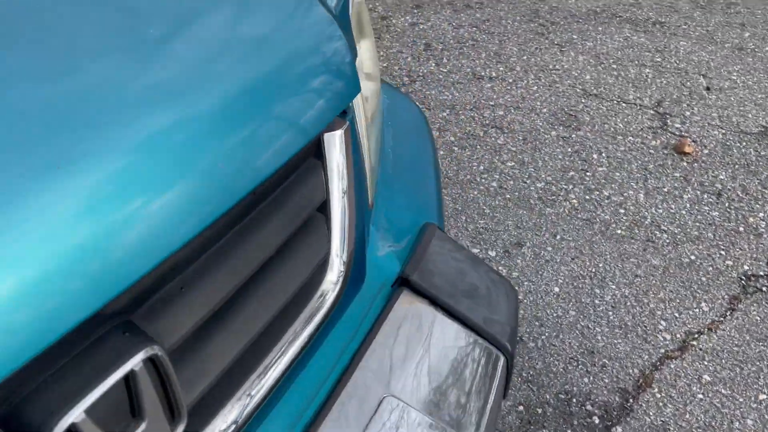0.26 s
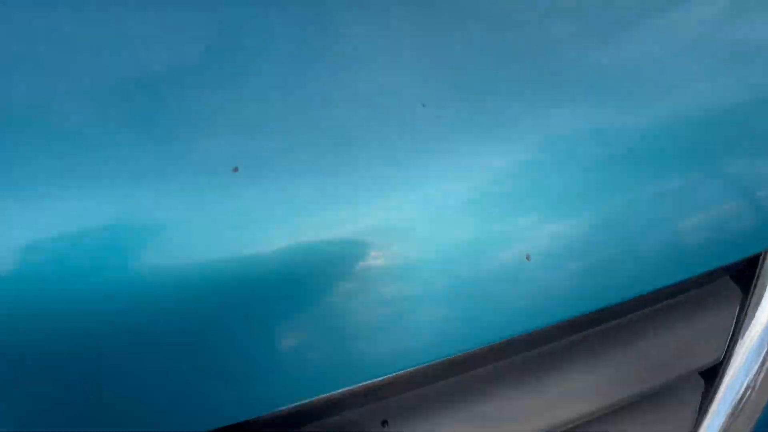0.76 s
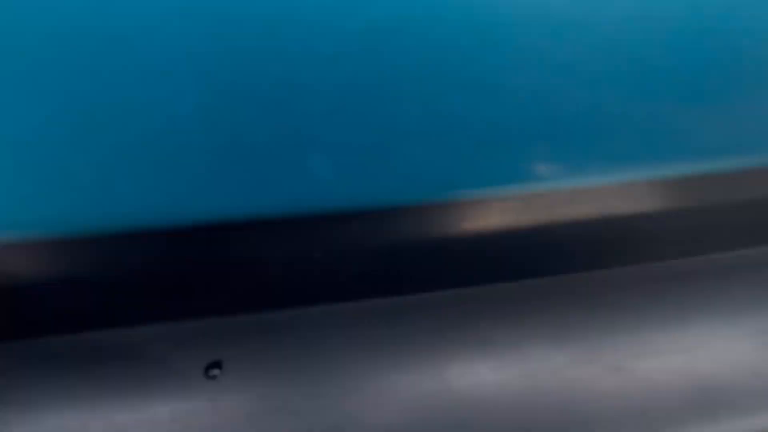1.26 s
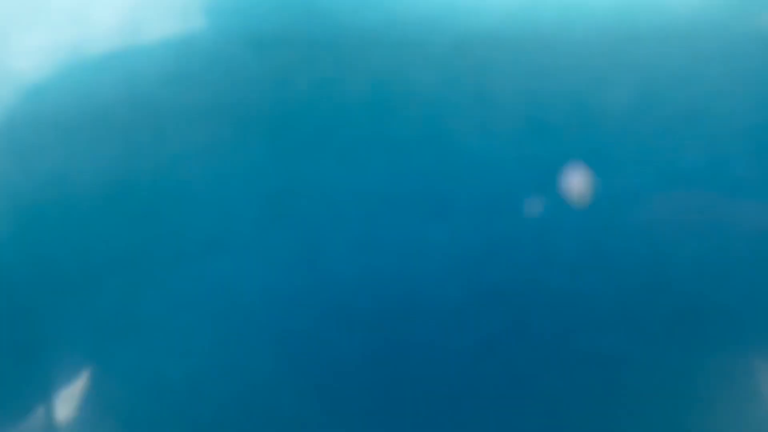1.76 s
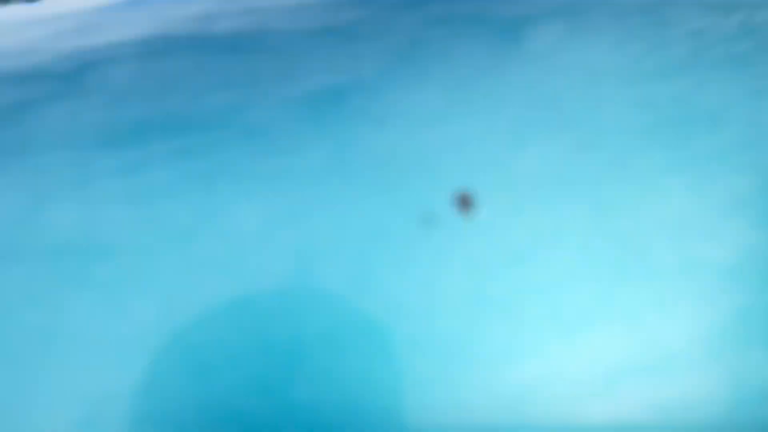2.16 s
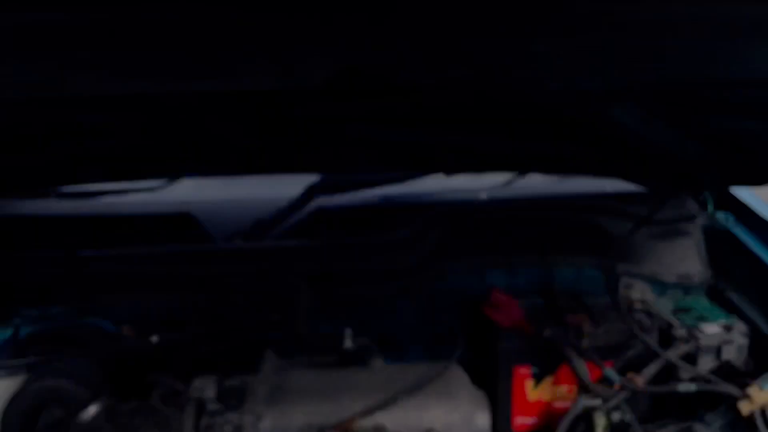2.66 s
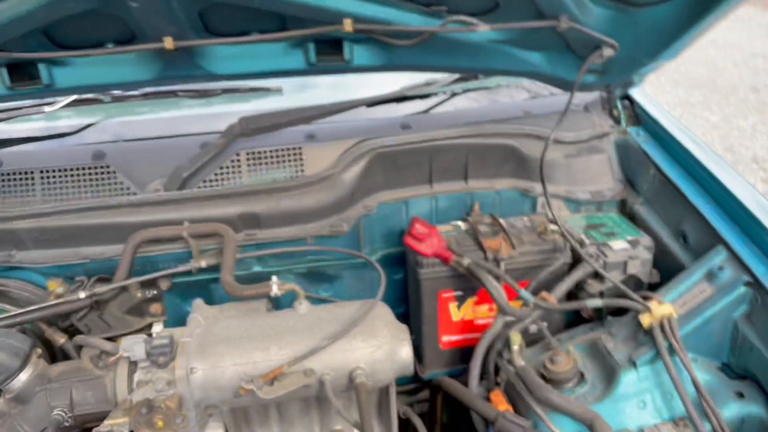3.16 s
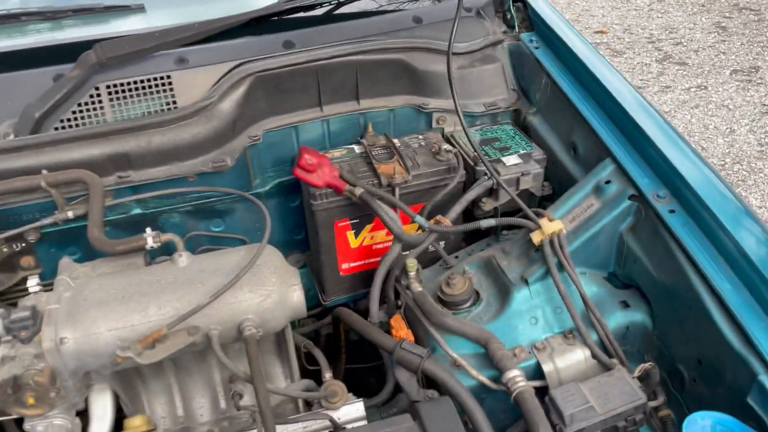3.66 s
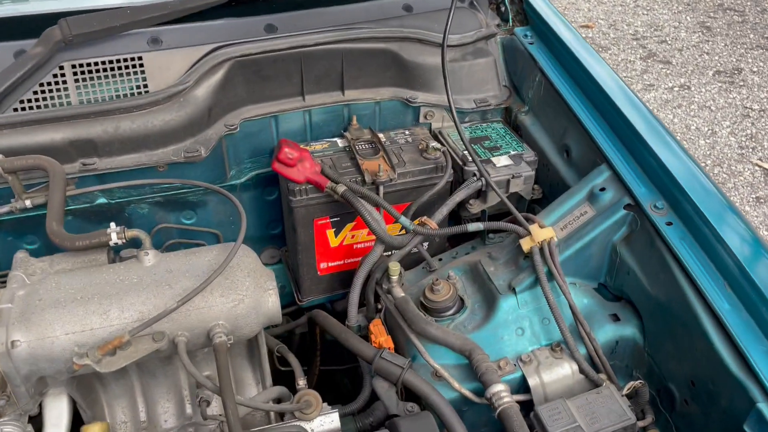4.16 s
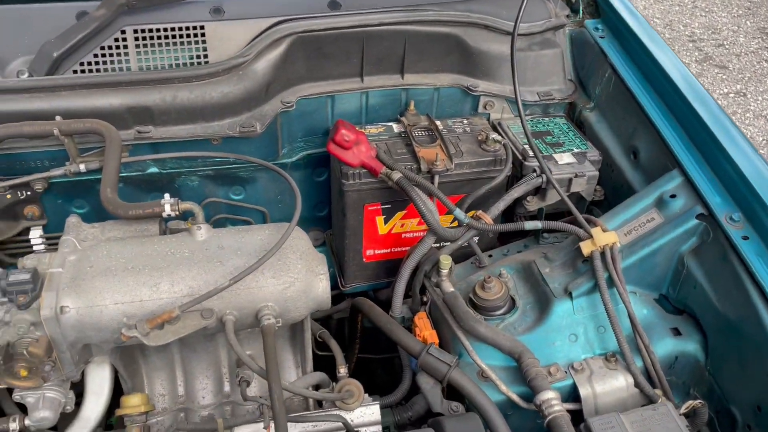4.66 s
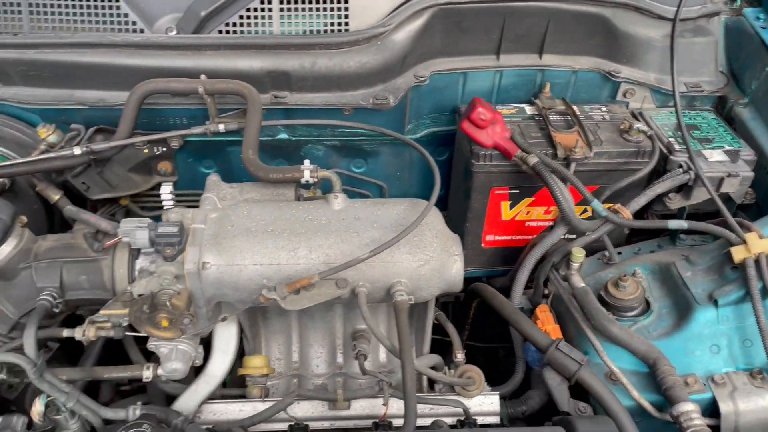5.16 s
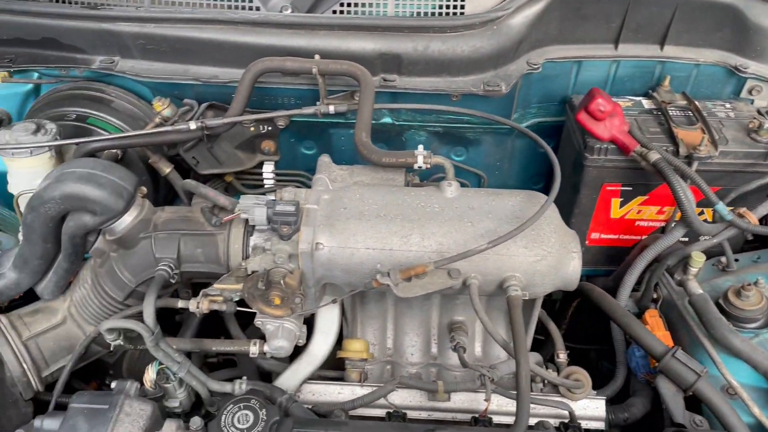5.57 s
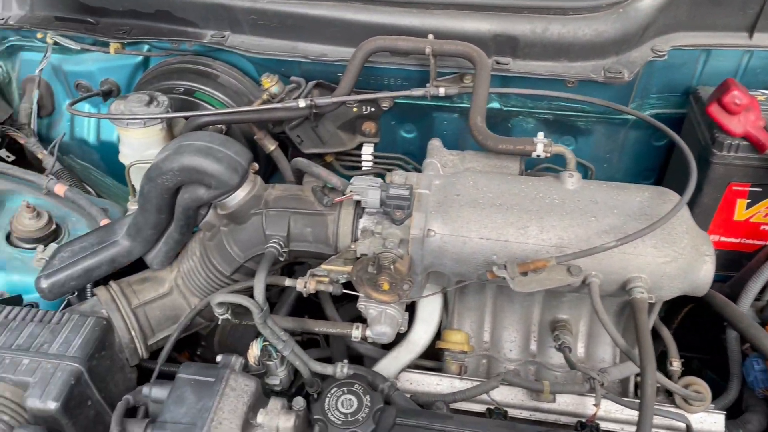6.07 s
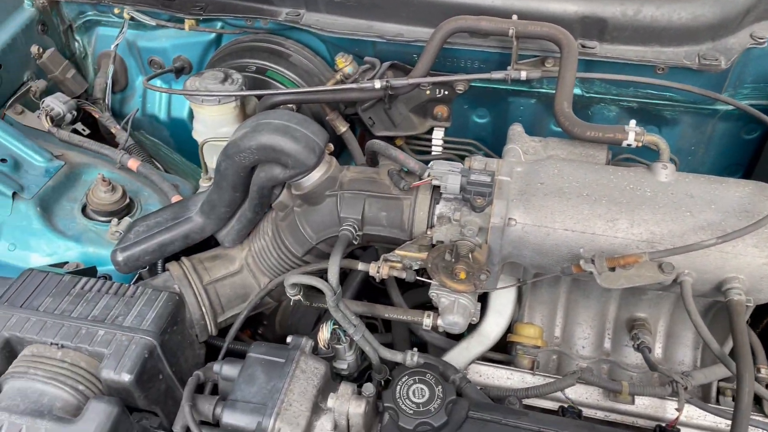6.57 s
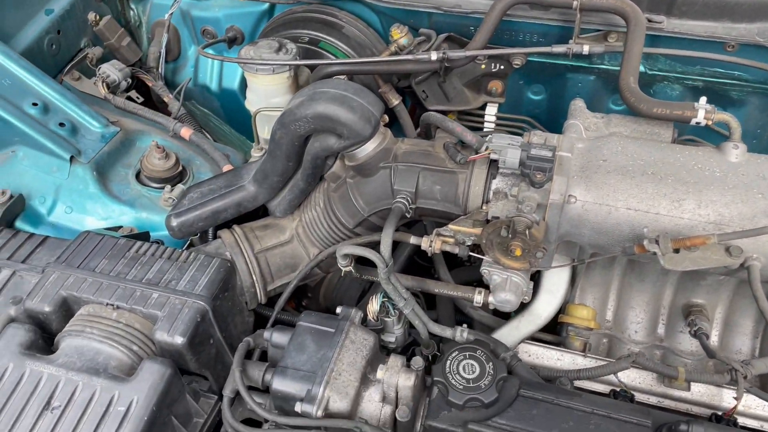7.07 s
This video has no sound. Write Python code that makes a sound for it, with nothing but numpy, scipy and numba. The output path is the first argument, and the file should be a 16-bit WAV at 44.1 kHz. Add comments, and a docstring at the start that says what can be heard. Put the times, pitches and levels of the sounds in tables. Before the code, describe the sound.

Outdoors on asphalt, a handheld microphone nears an idling four-cylinder car engine, dull behind grille and hood. Shoes scrape grit and snap small stones, the hood latch clacks and rattles, then the safety catch snaps harder. As the hood lifts, the idle grows bright and direct: ticking injectors, clattering valves, one regular knock, faint belt whine and pump hum. Wind rumbles and bumps against the microphone.

```python
"""A four-cylinder petrol engine idles outdoors: injectors tick, valves clatter, one cylinder knocks hardest.
A phone rounds the corner of the car and nears the grille; then the hood is unlatched and lifted.
The clatter, camshaft-timed bursts of filtered noise, comes through the grille, then straight from the open bay.
Belt whine and pump hum are wavering sines; latch and safety catch clack as cracks over decaying modes.
Close by, shoes scuff in grainy noise and snap stones; wind rumbles and its eddies swing at the microphone."""
import sys
import numpy as np
from scipy import signal
from scipy.fft import rfft, irfft, next_fast_len
from scipy.io import wavfile
from scipy.ndimage import uniform_filter1d, minimum_filter1d
from numba import njit

SR = 44100
rng = np.random.default_rng(int(sys.argv[2]) if len(sys.argv) > 2 else 0)


def generate_wav(sig):
    """Save sig (samples, or channels by samples) to the path in sys.argv[1] as 16-bit PCM at SR."""
    pcm = np.round(np.clip(np.atleast_2d(sig).T, -1, 1) * 32767).astype(np.int16)
    wavfile.write(sys.argv[1], SR, pcm)


N = 323253
TIME = np.arange(N) / SR
SIZE = next_fast_len(N + SR // 10, True)  # padded transform length
FREQS = np.maximum(np.arange(SIZE // 2 + 1) * SR / SIZE, 1.)


def undb(db):
    """Decibels to gain."""
    return 10 ** (np.asarray(db) / 20)


def unit(x):
    """Scale to rms 1."""
    return x / np.sqrt(np.mean(x ** 2))


def curve(table):
    """Join (time, value) points over time by straight lines."""
    return np.interp(TIME, *np.transpose(table))


def across(points, hz=FREQS):
    """Read (Hz, value) points on a log-frequency axis."""
    f, value = np.transpose(points)
    return np.interp(np.log(hz), np.log(f), value)


def colour(x, points):
    """Filter by a (Hz, dB) spectrum."""
    return irfft(rfft(x, SIZE) * undb(across(points)), SIZE)[..., :N]


def noise():
    """Two unrelated white noises: what the microphone ports share, and what sets them apart."""
    return rng.standard_normal((2, N))


def walk(rate):
    """Smooth random drift that changes about rate times a second; spread 1."""
    step = max(int(SR / rate / 2), 1)
    knots = np.arange(0, N + step, step)
    drift = np.interp(np.arange(N), knots, rng.standard_normal(len(knots)))
    return unit(uniform_filter1d(drift, step))


def fade(age, t60):
    """Exponential decay that starts at age 0 and falls 60 dB in t60 seconds."""
    return (age >= 0) * np.exp(-np.log(1000) * np.maximum(age, 0) / t60)


def push(s, length):
    """Bell-shaped push of a rub or scrape, centred on s seconds."""
    return np.exp(-(2 * (TIME - s) / length) ** 2)


# gusts at the microphone: start_s, length_s, level_db
GUST_TIMES = [(0.695, 0.23, -34.5), (1.15, 0.29, -30), (1.469, 0.017, -25), (1.529, 0.044, -22.5),
              (1.675, 0.046, -27), (1.712, 0.026, -25.5), (1.804, 0.099, -29.5), (2.18, 0.39, -31.5),
              (2.341, 0.035, -27), (2.841, 0.056, -32.5), (3.166, 0.04, -25.5), (3.346, 0.31, -29),
              (3.708, 0.11, -27.5), (4.01, 0.55, -36.5), (4.469, 0.11, -35.5), (4.593, 0.42, -27),
              (5.194, 0.071, -31.5), (5.463, 0.043, -28.5), (5.949, 0.011, -27), (6.888, 0.061, -36.5),
              (7.269, 0.032, -33)]
GUST_ATTACK_S, GUST_T60_S = 0.007, 0.41
BREEZE_DB = -40


def wind_level():
    """Wind level in dB: each gust rises, holds and dies away over the breeze, wavering throughout."""
    power = undb(BREEZE_DB) ** 2
    for s, length, db in GUST_TIMES:
        rise = np.clip((TIME - s) / GUST_ATTACK_S + .5, 0, 1)
        fall = fade(np.maximum(TIME - s - length, 0), GUST_T60_S)
        power = power + (undb(db) * rise * fall) ** 2
    return 10 * np.log10(power) + 1.5 * walk(15)


# turbulent rumble at the microphone: pitch_hz, relative level_db
RUMBLE_COLOUR = [(20, -46), (35, -14), (58, 0.5), (90, -1.5), (140, -2.5), (250, -9), (400, -19.5),
                 (800, -52), (3000, -51)]


def wind(gust_db):
    """Turbulence rumbles in ragged gusts; a higher flutter gains on the rumble as the wind strengthens."""
    rumble = unit(colour(noise(), RUMBLE_COLOUR) * undb(2.0 * walk(35)))
    flutter_colour = [(80, -17), (250, 1.0), (520, -7), (850, -22.0), (3000, -50)]
    flutter = unit(colour(noise(), flutter_colour) * undb(6.1 * walk(70)))
    strength_db = np.minimum(gust_db + 24.5, 0)  # the small swirls level off in a full gust
    return undb(gust_db) * rumble + undb(-31.0 + 1.4 * strength_db) * flutter


# hardest eddies that hit the microphone: time_s, relative level_db, pitch_hz
HARD_EDDIES = [(.73, -16, 260), (1.245, -16, 330), (1.288, -7, 262), (1.334, -8, 100), (1.36, -10, 198),
               (1.39, -20, 230), (1.413, -18, 270), (1.473, -10, 600), (1.488, -9.5, 234),
               (1.551, -8.5, 254), (1.579, -7, 190), (1.59, -13, 90), (1.72, -12, 430), (1.729, -6, 96),
               (1.789, -6, 171), (1.832, -7.5, 260), (2.196, -16, 240), (2.235, -15, 200),
               (2.366, -11.5, 330), (2.385, -16, 190), (2.411, -18, 260), (2.491, -17, 400),
               (3.173, -13, 348), (3.209, -8, 141), (3.37, -12, 219), (3.487, -16, 350), (3.567, -7.5, 234),
               (3.594, -9.5, 220), (3.7255, -9, 553), (3.728, -7, 240), (3.8, -16, 220), (3.823, -14, 330),
               (4.09, -14.5, 230), (4.659, -22, 226.5), (4.683, -17, 424), (4.726, -12, 290),
               (4.764, -8, 360), (4.805, -12, 450), (4.849, -10, 352), (4.905, -14, 248), (4.94, -13, 260),
               (4.955, -10.5, 420), (4.993, -11, 190), (5.007, -11, 422), (5.052, -19, 300.4),
               (5.485, -11, 261), (5.985, -10.5, 68.2)]
# lesser eddies: count, level over the wind's in dB, middle pitch in Hz, spread of pitch in octaves
SWIRL_COUNT, SWIRL_DB, SWIRL_HZ, SWIRL_OCTAVES = 110, -0.5, 201, 0.62
EDDY_SLOWING = 0.44  # how fast the swings stretch out


def eddies(gust_db):
    """Each eddy swings the pressure fast, then slower, alike at both ports; lesser ones grow with the wind."""
    out = np.zeros(N)
    lesser = []
    for i in rng.integers(0, N, SWIRL_COUNT):
        hz = SWIRL_HZ * 2 ** (SWIRL_OCTAVES * rng.standard_normal())
        lesser.append((TIME[i], gust_db[i] + SWIRL_DB, hz))
    for s, db, hz in HARD_EDDIES + lesser:
        middle = int(s * SR)
        span = slice(max(middle - SR // 20, 0), middle + SR // 20)
        stretch = np.maximum(1 + EDDY_SLOWING * (TIME[span] - s) * hz, 1e-9)
        swing = np.log(stretch) / EDDY_SLOWING  # in cycles
        envelope = np.exp(-(swing / 0.58) ** 2)
        out[span] += undb(db - 5.5) * envelope * np.sin(2 * np.pi * (swing + rng.random()))
    return out


# steady pump hum as it reaches the phone: time_s, level_db
PUMP_REACH = [(0, -53), (2, -56), (2.7, -44.5), (3.8, -47.5), (5.6, -47.5), (6.1, -43.5)]
PUMP_HZ = 488.5


def pump():
    """A small electric motor, probably the fuel pump, holds one pitch whatever the crank does."""
    level = np.sqrt(2) * undb(curve(PUMP_REACH) + 3.2 * walk(14))
    return level * np.sin(2 * np.pi * PUMP_HZ * TIME + 0.5 * walk(14))


# shoe scrapes on gritty asphalt: time_s, length_s, level_db, pitch_hz
SHOE_SCRAPES = [(0.265, .03, -39, 1150), (0.313, 0.023, -38.5, 1250), (0.55, 0.026, -36.5, 2130),
                (0.609, 0.013, -22, 795), (0.627, 0.013, -32, 1170), (0.651, 0.017, -30, 1480)]
# stones under the sole: time_s, level_db, pitch_hz
STONE_SNAPS = [(.2455, -15, 1240), (.2605, -20, 1200), (.6025, -14, 700), (.617, -23, 1100),
               (.627, -17, 1300), (0.6431, -11.5, 1450), (.655, -22, 1500)]
SNAP_T60_S = 0.005


def scuffs():
    """A shoe scrapes in short grainy pushes, each with its own pitch, and single stones snap under the sole."""
    out = np.zeros((2, N))
    for s, length, db, hz in SHOE_SCRAPES:
        grit = noise() * undb(6.1 * walk(600))
        peak = [(hz / 4, -18), (hz * .7, -5), (hz, 0), (hz * 1.1, -4), (hz * 2, -24), (hz * 6, -40)]
        out += undb(db) * push(s, length) * unit(colour(grit, peak))
    for s, db, hz in STONE_SNAPS:
        # a snap goes only into the sound the ports share
        out[0] += undb(db) * fade(TIME - s, SNAP_T60_S) * np.sin(2 * np.pi * hz * (TIME - s))
    return out


# crack of steel on steel: pitch_hz, relative level_db
STEEL_CRACK = [(100, -4), (450, 7), (800, -1.5), (1500, 1.5), (4500, -7.5), (7500, -1), (9000, -3),
               (13000, -9.5), (16000, -23)]
# fade of the crack, before each clack's own share: pitch_hz, t60_s
STEEL_CRACK_FADE = [(200, 0.28), (1500, 0.19), (5000, 0.074), (13000, 0.041)]
CHATTER_DB, CHATTER_PER_S = 4, 460  # loose steel chatters in the crack
SWELL_CYCLES = .8  # a mode takes this many cycles to build up


def clacks(hits, modes, ring_db, crack_db):
    """Steel slaps on steel: a crack whose treble dies first, then modes of which the low ones swell last."""
    out = np.zeros((2, N))
    age = TIME[:SR // 3]
    size = len(age)
    hz = np.maximum(np.arange(size // 2 + 1) * SR / size, 1)
    octaves = 125 * 2. ** np.arange(8)
    for s, db, ring, tilt_db in hits:
        chatter = undb(CHATTER_DB * walk(CHATTER_PER_S)[:size])
        grit = rfft(rng.standard_normal((2, size)) * chatter) * undb(across(STEEL_CRACK, hz))
        crack = np.zeros((2, size))
        for f in octaves:
            band = irfft(grit * (np.abs(np.log2(hz / f)) < .5), size)
            crack += band * fade(age, ring * across(STEEL_CRACK_FADE, f))
        body = np.zeros((2, size))
        for f, mode_db, t60 in modes:
            swell = np.minimum(age * f / SWELL_CYCLES, 1)
            tone = np.sin(2 * np.pi * (f * age + rng.random((2, 1))))
            body += undb(mode_db) * swell * fade(age, ring * t60) * tone
        mix = undb(crack_db) * unit(crack) + undb(ring_db) * unit(body)
        # tilt about 2 kHz, flat below 500 Hz
        hardness = undb(tilt_db * np.log2(np.maximum(hz, 500) / 2000))
        clack = irfft(rfft(mix) * hardness, size)[:, :size // 2]
        start = int(s * SR)
        onset = np.std(clack[:, :SR // 200])  # the level is that of the first 5 ms
        out[:, start:start + size // 2] += undb(db) * clack / onset
    return out


# hood latch snaps, the panel follows and rattles: time_s, level_db, ring_length_share, tilt_db_per_octave
LATCH_HITS = [(1.181, -19, 0.49, 0.5), (1.184, -15, 0.76, -0.4), (1.1985, -20, 0.88, -3.5),
              (1.211, -39, .9, 0), (1.471, -27, 0.42, -4.5), (1.487, -28, 0.46, -4)]
# steel round the latch, hood held down: pitch_hz, relative level_db, t60_s before the ring share
LATCH_RING = [(351, -4.5, 0.16), (400, -1, .14), (480, -10, 0.11), (583, -1, 0.089), (1007, -8, .14),
              (1200, -9, .08), (1513, -4.5, 0.13), (1850, -4, 0.064), (2020, -2, 0.076), (2590, -4, 0.14),
              (2750, 0, 0.054), (3250, 3, 0.046), (4040, -3, 0.069), (4450, -3, 0.04)]


def latch():
    """The latch springs open and the panel rattles: cracks and modes of the held-down steel."""
    return clacks(LATCH_HITS, LATCH_RING, ring_db=4.5, crack_db=2.0)


# safety catch slips and strikes its stop: time_s, level_db, ring_length_share, tilt_db_per_octave
CATCH_HITS = [(1.903, -9, 0.48, 5.5), (1.907, -4, 0.88, -0.2), (1.916, -20, 1.3, 0.5),
              (1.925, -19, 0.87, -2)]
# steel round the catch, hood ajar: pitch_hz, relative level_db, t60_s before the ring share
CATCH_RING = [(251, -12, 0.39), (495, 2.5, 0.07), (595, 2, 0.081), (882, -6.5, 0.12), (1020, -10, .08),
              (1240, -14, .1), (1437, -9, 0.1), (1770, -5.5, 0.066), (1910, 0, 0.065), (2760, -10, .06),
              (3076, -5, .07), (3570, -7, .055), (3860, -6, 0.076), (4080, -11, .06), (4620, -1.5, 0.055),
              (6530, -2, 0.032), (13100, -13, .028)]
# a rub of the catch, then the short hiss that leads into its snap: time_s, length_s, level_db
CATCH_HISS = [(1.803, 0.022, -34), (1.9, 0.01, -23.5)]
# colour of the rub and hiss: pitch_hz, relative level_db
CATCH_HISS_COLOUR = [(1200, -25), (2100, -11), (2500, 0), (2900, -5), (4300, -11), (7000, -14),
                     (10000, -30)]


def catch():
    """The catch rubs as it is pushed aside, then lets go with a hard snap."""
    swells = sum(undb(db) * push(s, length) for s, length, db in CATCH_HISS)
    hiss = swells * unit(colour(noise(), CATCH_HISS_COLOUR))
    return hiss + clacks(CATCH_HITS, CATCH_RING, ring_db=2.5, crack_db=0)


# belt-driven pulleys and alternator: multiple of crank speed, relative level_db
PULLEY_TONES = [(27.8, -55), (34.5, -46.5), (62.5, -52.5), (75.5, -56), (104.7, -75), (182.6, -57.5)]
# whine as it reaches the phone: time_s, relative level_db
WHINE_REACH = [(0, -5), (1.8, -8), (2.8, -6), (3.0, 5.5), (3.6, 0.5), (4.0, -17), (4.6, 5.5), (5.7, -6),
               (6, 6)]
BELT_SLIP = .011  # spread of the slip, radians of the crank
JERK_TURNS = .003  # each firing jerks the crank, which roughens the tones


def whine(crank):
    """Pulley tones follow the crank; belt slip makes the higher ones waver most."""
    jerked = crank + JERK_TURNS * np.sin(2 * np.pi * 2 * crank)  # two firings a turn
    tones = 0
    for multiple, db in PULLEY_TONES:
        phase = 2 * np.pi * multiple * jerked + BELT_SLIP * multiple * walk(9)
        tones = tones + undb(db + 2.1 * walk(22)) * np.sin(phase)
    return np.sqrt(2) * undb(curve(WHINE_REACH)) * tones


# steady whirr of the running engine: pitch_hz, relative level_db
WHIRR_SPECTRUM = [(22, -28), (48, 7.5), (120, -3), (210, 2), (290, -9), (370, -4), (550, -2), (720, -2.5),
                  (1000, -1), (1600, -6), (3200, -7), (4300, -13), (5100, -13), (5500, -16.5), (6400, -13),
                  (9000, -20.5), (12000, -14), (16000, -47)]


def whirr():
    """Broad noise of the running engine, gently unsteady."""
    return undb(-34.4) * unit(colour(noise(), WHIRR_SPECTRUM)) * undb(0.6 * walk(11))


PLAY_S = .0004  # play in the mechanism: blows come a little early or late


def blows(cycle, pattern, spectrum, t60, contact, alike, scatter_db, uneven_db):
    """Blows timed by the camshaft; each part has dense modes, and a share of its ring repeats every time."""
    age = TIME[:SR // 5]
    size = len(age)
    shape = fade(np.maximum(age - contact, 0), t60)  # the part chatters while it seats, then dies away
    hz = np.arange(size // 2 + 1) * SR / size
    clusters = np.arange(0, SR / 2, 220)
    turns = np.arange(-1, int(cycle[-1]) + 1)
    rings, power = np.zeros((2, N + size)), np.zeros(N + size)
    for place, db in pattern:
        # clusters of modes stand out unevenly from one another
        voice = undb(uneven_db * np.interp(hz, clusters, rng.uniform(-1.4, 1, len(clusters))))
        ring = shape * unit(irfft(rfft(rng.standard_normal((2, size))) * voice, size))
        starts = np.interp(turns + place, cycle, np.arange(N), left=-1, right=-1).astype(int)
        for start in starts[starts >= 0]:
            start = np.clip(start + int(PLAY_S * SR * rng.standard_normal()), 0, N)
            force = undb(db + scatter_db * rng.standard_normal())
            rings[:, start:start + size] += force * ring
            power[start:start + size] += (force * shape) ** 2
    rattle = np.sqrt(power[:N]) * noise()  # the share that differs each time
    mix = np.sqrt(alike) * rings[:, :N] + np.sqrt(1 - alike) * rattle
    return unit(colour(mix, spectrum))


# firings in one four-stroke cycle: place_in_cycle (0-1), relative level_db
FIRING_BLOWS = [(0.032, -0.82), (0.281, 0.96), (0.529, -1.6), (0.831, -0.83)]
# engine block: pitch_hz, relative level_db
BLOCK_SPECTRUM = [(25, -22), (50, 7), (100, 8), (200, -19), (290, -1), (420, -1.5), (600, -2.5), (750, -37),
                  (1500, -12.5), (5000, -70)]


def firings(cycle):
    """Four firings a cycle thud through the block."""
    return undb(-40.5) * blows(cycle, FIRING_BLOWS, BLOCK_SPECTRUM, t60=0.1, contact=0.011,
                               alike=0.56, scatter_db=3.0, uneven_db=2.0)


# tappets in one cycle: place_in_cycle (0-1), relative level_db
TAPPET_BLOWS = [(.235, -1), (.485, 0), (.735, -1.5), (.985, 6)]
# tappets: pitch_hz, relative level_db
TAPPET_SPECTRUM = [(1000, 0), (2500, 0.5), (3500, 2), (5000, -2), (6500, -14), (9000, -8), (15000, -21)]


def tappets(cycle):
    """Tappets tap with nearly the same ring each time."""
    return undb(-41.5) * blows(cycle, TAPPET_BLOWS, TAPPET_SPECTRUM, t60=0.1, contact=0.0034,
                               alike=0.95, scatter_db=2.0, uneven_db=13)


# injectors in one cycle: place_in_cycle (0-1), relative level_db
INJECTOR_BLOWS = [(.196, 4), (.444, 6.5), (.694, 4), (0.945, 2.5)]
# injectors: pitch_hz, relative level_db
INJECTOR_SPECTRUM = [(2000, -7), (4500, -9), (7000, -9), (9000, -2.5), (11500, 4), (13600, 1.5),
                     (14600, -0.5), (16000, -38)]


def injectors(cycle):
    """Injectors tick in the treble, short and mostly different each time."""
    return undb(-40.5) * blows(cycle, INJECTOR_BLOWS, INJECTOR_SPECTRUM, t60=0.054, contact=0.0041,
                               alike=0.21, scatter_db=2.2, uneven_db=6.5)


# valves in one cycle: place_in_cycle (0-1), relative level_db
VALVE_BLOWS = [(0.036, 4), (.285, 3), (0.536, 2.8), (0.785, 4.5)]
# valves: pitch_hz, relative level_db
VALVE_SPECTRUM = [(700, -22), (1500, -4.5), (3200, 6.5), (5000, -7.5), (6500, -1.5), (8500, -11),
                  (11500, 3), (13500, -10.5), (14600, -6), (16000, -37)]


def valves(cycle, facing_db):
    """Valves clatter on their seats under the cover, which the phone comes to face."""
    level = undb(-41.5 + facing_db / 2)
    return level * blows(cycle, VALVE_BLOWS, VALVE_SPECTRUM, t60=0.099, contact=0.0024,
                         alike=0.55, scatter_db=1.2, uneven_db=14.5)


# knocks in one cycle, one cylinder hardest: place_in_cycle (0-1), relative level_db
KNOCK_BLOWS = [(0.044, -9), (0.29, -19), (0.54, 1), (0.796, -10)]
# knock: pitch_hz, relative level_db
KNOCK_SPECTRUM = [(400, -14), (900, -4.5), (1400, 2.5), (1900, 3.5), (2600, 8), (3000, -6), (4500, -6.5),
                  (6000, -7), (9000, -9), (12000, -6), (15000, -9)]


def knock(cycle, facing_db):
    """One cylinder knocks hardest, almost equally strong every cycle."""
    level = undb(-38.5 + facing_db)
    return level * blows(cycle, KNOCK_BLOWS, KNOCK_SPECTRUM, t60=0.092, contact=0.0026,
                         alike=0.75, scatter_db=0.3, uneven_db=1.5)


# resonances of the engine bay: pitch_hz, width_hz, lift_db
BAY_RESONANCES = [(413, 16, 10.5), (601, 53, 5.5), (973, 54, 2.5), (1294, 390, 5.5), (1856, 250, 3),
                  (2319, 29, 6.5), (3170, 80, 5), (3820, 116, 5.5), (4570, 110, 2.5), (5160, 160, 4),
                  (6030, 140, 5)]


def bay(sound):
    """The cavity of the engine bay lifts its resonances."""
    lift_db = sum(db / (1 + (2 * (FREQS - hz) / width) ** 2) for hz, width, db in BAY_RESONANCES)
    return irfft(rfft(sound, SIZE) * undb(lift_db), SIZE)[:, :N]


# crankshaft speed at idle: time_s, speed_rpm
CRANK_SPEED = [(0.0, 762.4), (0.8, 764.4), (1.8, 767.6), (2.7, 756.6), (3.0, 766), (3.7, 767), (4.0, 750),
               (4.3, 752), (4.7, 762), (4.95, 752), (5.2, 760), (5.5, 748), (5.8, 756), (6.1, 763),
               (6.3, 748), (6.55, 768), (6.8, 762), (7.05, 750), (7.33, 766)]
START_CYCLE = .0745  # place in the cycle at the start, 0-1


def engine():
    """Clatter and whine follow the crank: two turns make one cycle of four firings."""
    crank = np.cumsum(curve(CRANK_SPEED)) / 60 / SR  # turns
    cycle = START_CYCLE + crank / 2
    # the valve cover and the knocking cylinder come into line as the phone moves across the bay
    facing_db = np.interp(TIME, [4.6, 6], [-2.5, 1.5])
    parts = whirr() + firings(cycle) + tappets(cycle) + injectors(cycle)
    parts += valves(cycle, facing_db) + knock(cycle, facing_db)
    return bay(parts), whine(crank)


@njit
def resonate(x, hz, width):
    """State-variable band-pass whose centre moves; gain 1 at the centre."""
    y, band, low = np.empty(len(x)), 0., 0.
    for i in range(len(x)):
        g, k = np.tan(np.pi * hz[i] / SR), width / hz[i]
        v = (band + g * (x[i] - low)) / (1 + g * (g + k))
        band, low = 2 * v - band, low + 2 * g * v
        y[i] = k * v
    return y


# rings of the gap under the hood: opening (0-1), opening_spread, relative level_db, pitch_hz, width_hz
GAP_WIDTHS = [(.17, 0.045, 1, 4800, 895), (.28, .09, -0.5, 3800, 1100), (.45, .2, 0, 3300, 1223)]
GAP_OCTAVES = 1.4  # slope of a ring's rise per full opening; its slide is held within 0.2 octave


def gap(sound, opening):
    """The gap under the hood rings at certain widths, and each ring slides up as the hood rises."""
    out = np.zeros((2, N))
    for best, spread, db, hz, width in GAP_WIDTHS:
        centre = hz * 2 ** np.clip(GAP_OCTAVES * (opening - best), -.2, .2)
        ring = sound
        for _ in range(2):
            ring = np.array([resonate(x, centre, float(width)) for x in ring])
        out += undb(db) * np.exp(-((opening - best) / spread) ** 2) * ring
    return out


# hood rises slightly, is eased against the safety catch, then lifted: time_s, opening (0-1)
HOOD_OPENING = [(.7, 0.01), (1.2, 0.17), (1.85, 0.27), (2.05, 0.66), (2.7, 1)]
# path through the grille and closed hood: pitch_hz, relative level_db
GRILLE_PATH = [(50, -19), (300, 3), (400, 0.5), (650, -2), (820, 0.5), (900, -9), (1070, -6), (1200, -0.5),
               (1450, -3), (1620, -4), (2200, -2.5), (2900, -9), (4000, -8), (5000, -9.5), (7000, -10),
               (14000, -16.5)]
FAR_DB, ARRIVE_S = -6, 1.37  # the phone starts this much weaker and reaches the grille at this time
GRILLE_SHUT_DB, GRILLE_LIFTED_DB = 0.5, -12.5
LEAK_DB, OPEN_DB = -17, -1.5  # direct paths: leak round the hood, and what full opening adds


def hood(sound):
    """The shut hood leaves a dull path through the grille; ajar, its gap rings; lifted, the path is direct."""
    opening = np.clip(curve(HOOD_OPENING), 0, 1)
    near = undb(FAR_DB * np.maximum(1 - TIME / ARRIVE_S, 0))
    # the lid shades the grille only when high
    grille_db = GRILLE_SHUT_DB + (GRILLE_LIFTED_DB - GRILLE_SHUT_DB) * opening ** 4
    detour = np.roll(colour(sound, GRILLE_PATH), SR // 90, axis=-1)  # the way round the radiator is longer
    slit = np.roll(gap(sound, opening), SR // 400, axis=-1)
    direct = (undb(LEAK_DB) + undb(OPEN_DB) * opening) * sound
    return near * (undb(grille_db) * detour + slit + direct)


# engine heard from behind the wing: pitch_hz, relative level_db
WING_PATH = [(500, 2.5), (1000, -2.5), (2200, -5.5), (5000, 2.5), (12000, 1.5)]
CORNER_S, CORNER_LENGTH_S = 0.61, 0.4  # the corner is rounded by this time, taking this long


def shade(sound):
    """Until the phone rounds the corner of the car, the wing hollows the sound between 1 and 3 kHz."""
    behind = np.clip((CORNER_S - TIME) / CORNER_LENGTH_S, 0, 1)
    return sound + behind * (colour(sound, WING_PATH) - sound)


# microphone pair: pitch_hz, likeness (0-1)
PORT_LIKENESS = [(60, .83), (400, .86), (900, .68), (2200, .67), (3500, .58), (5000, .68), (5500, .5),
                 (7000, .6), (8500, .99), (10000, .88), (12500, .93), (13500, .99)]
# microphone pair: pitch_hz, phase by which left leads in radians
PORT_LEAD = [(400, .1), (1100, .6), (1800, -.3), (2700, 1.4), (3800, .6), (5250, .6), (5750, -1.6),
             (6500, -.9), (7700, -2.9), (8700, -3.14), (9500, -3.4), (10000, -4.1), (13300, -6.2),
             (16000, -6.28)]
# microphone pair: pitch_hz, left_minus_right_db
PORT_BALANCE = [(150, 0), (600, 3), (1200, 3), (2300, -1.5), (3300, 2), (5000, 2.5), (5800, 0.5), (7500, 0),
                (9000, -1.5)]


def ports(pair):
    """Two close microphone ports hear much the same sound, shifted in phase and level."""
    common, apart = rfft(pair, SIZE)
    like = np.clip(across(PORT_LIKENESS), 0, 1)
    side = np.array([[1], [-1]])  # left, right
    both = common * np.sqrt((1 + like) / 2) + side * apart * np.sqrt((1 - like) / 2)
    both = both * undb(side * across(PORT_BALANCE) / 2)
    lag = np.exp(-1j * across(PORT_LEAD) * np.array([[0], [1]]))
    return irfft(both * lag, SIZE)[:, :N]


def scene():
    """Wind, pump, shoes and latch round the engine under its hood, all at the phone."""
    gust_db = wind_level()
    clatter, tones = engine()
    pair = wind(gust_db) + scuffs() + latch() + catch() + shade(hood(clatter))
    # the eddies, hum and whine are alike at both ports
    return ports(pair) + eddies(gust_db) + pump() + tones


LIMIT_DB, HOLD_S, RELEASE_S = 0, 0.11, 0.034
TOP_HZ = 15900


def record(dry):
    """A limiter ducks on peaks over full scale, holds and recovers; the top is cut."""
    needed = np.minimum(undb(LIMIT_DB) / np.maximum(np.abs(dry).max(axis=0), 1e-9), 1)
    hold = int(HOLD_S * SR) // 2 * 2 + 1
    held = minimum_filter1d(needed, hold, origin=hold // 2)
    # the reduction dies away exponentially once the hold is over
    cut = np.maximum.accumulate(np.log(1 - held + 1e-9) + TIME / RELEASE_S) - TIME / RELEASE_S
    smooth = SR // 1000
    gain = uniform_filter1d(minimum_filter1d(1 - np.exp(cut), smooth), smooth)
    low_pass = signal.ellip(8, .2, 80, TOP_HZ, fs=SR, output="sos")
    return signal.sosfilt(low_pass, dry * gain)


dry = scene()
out = record(dry)
generate_wav(out)
```